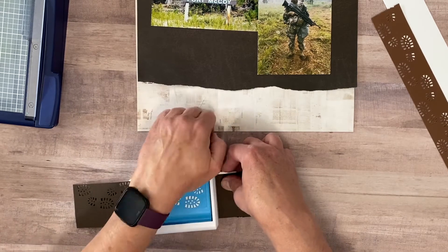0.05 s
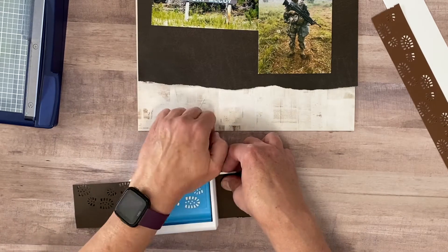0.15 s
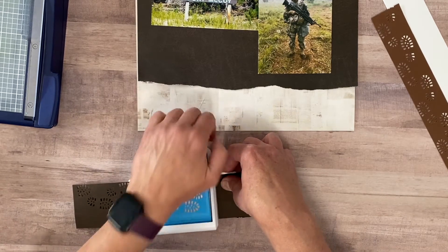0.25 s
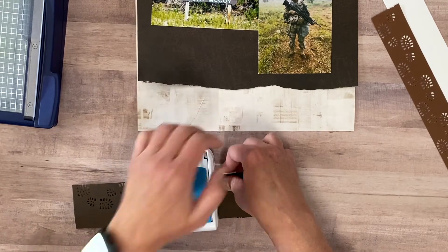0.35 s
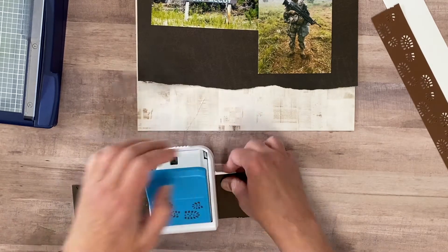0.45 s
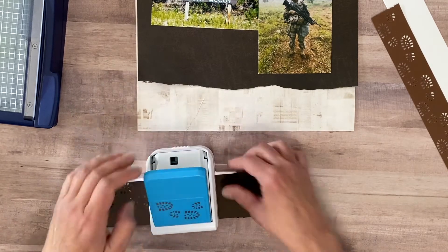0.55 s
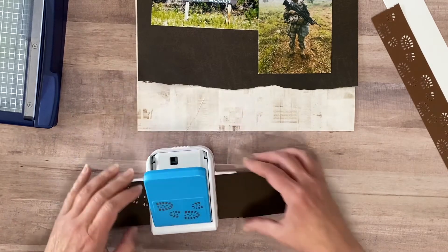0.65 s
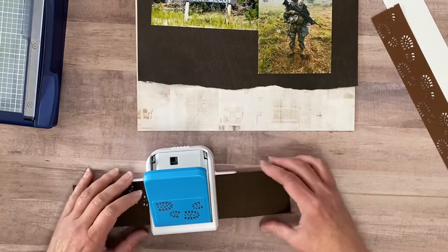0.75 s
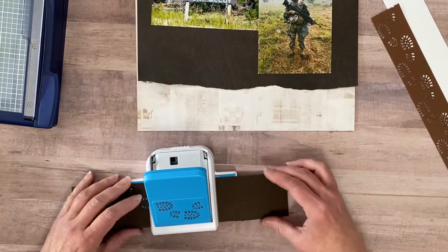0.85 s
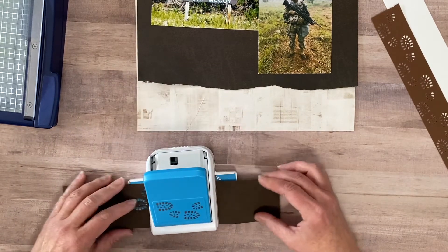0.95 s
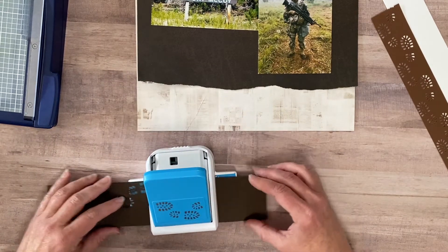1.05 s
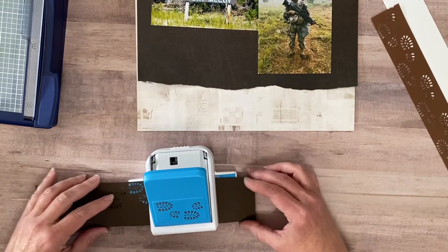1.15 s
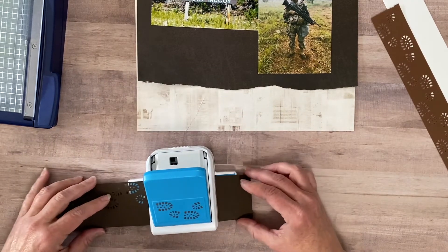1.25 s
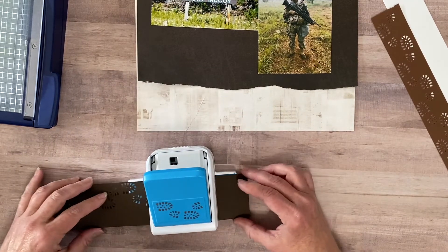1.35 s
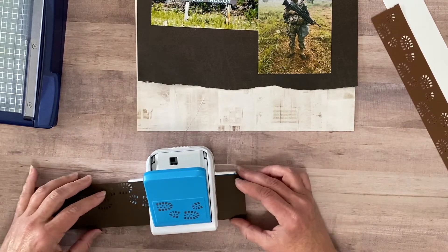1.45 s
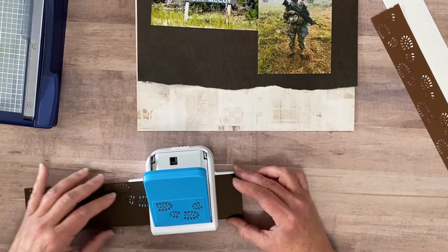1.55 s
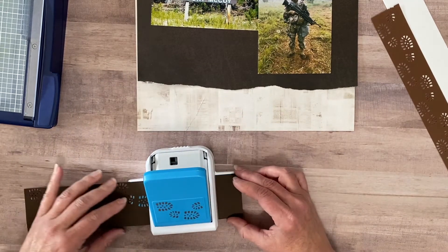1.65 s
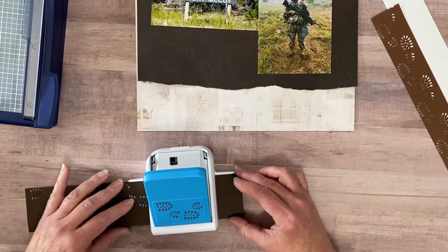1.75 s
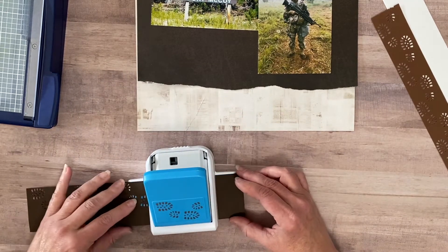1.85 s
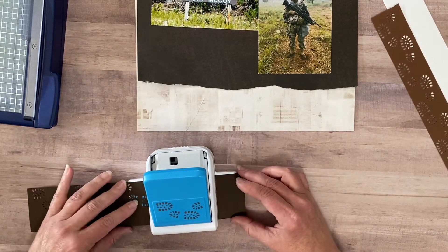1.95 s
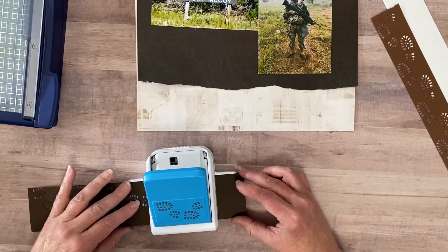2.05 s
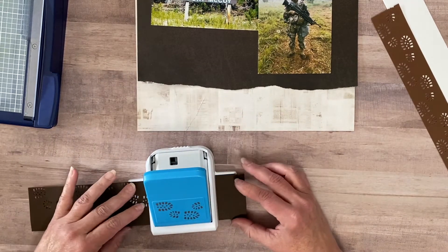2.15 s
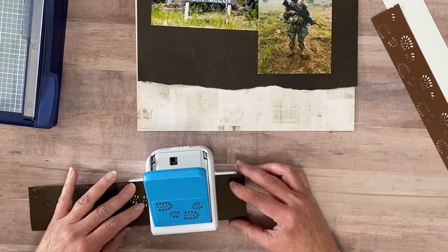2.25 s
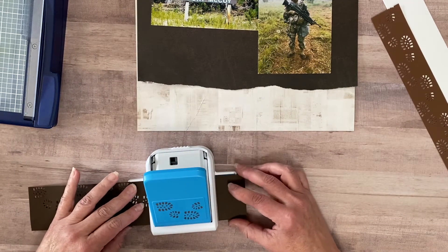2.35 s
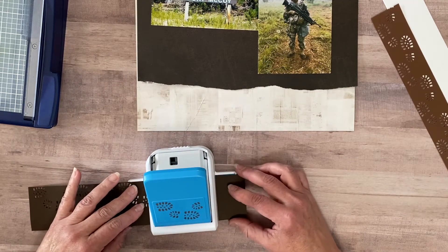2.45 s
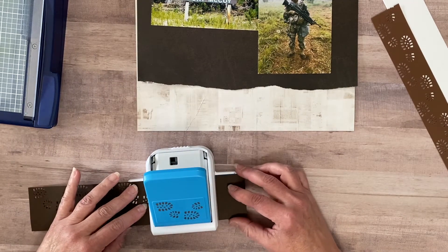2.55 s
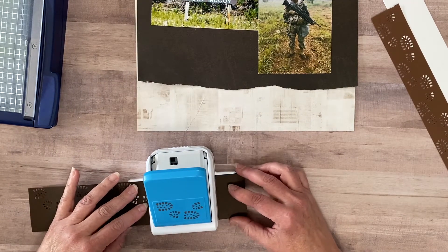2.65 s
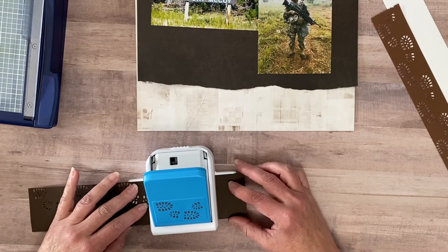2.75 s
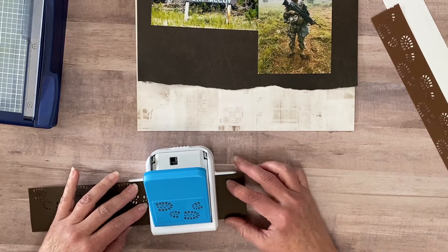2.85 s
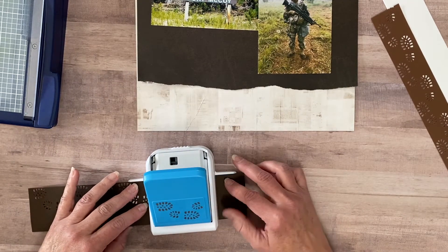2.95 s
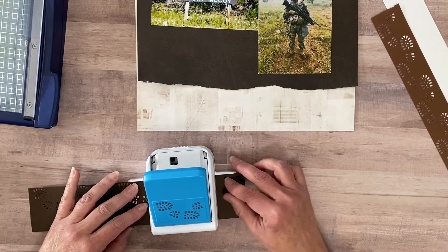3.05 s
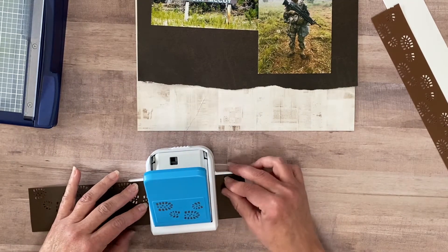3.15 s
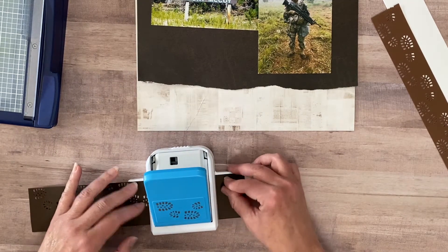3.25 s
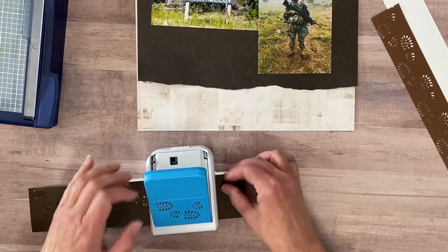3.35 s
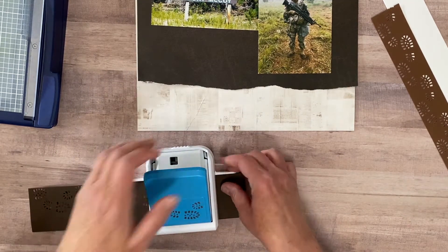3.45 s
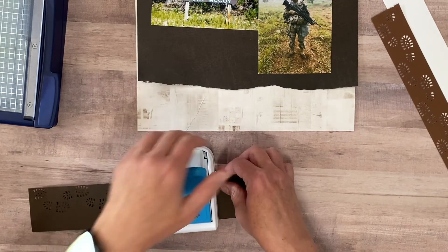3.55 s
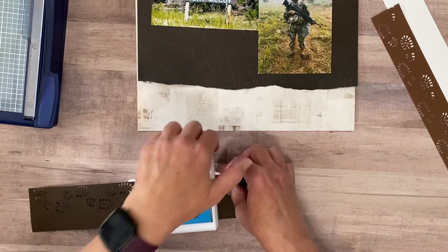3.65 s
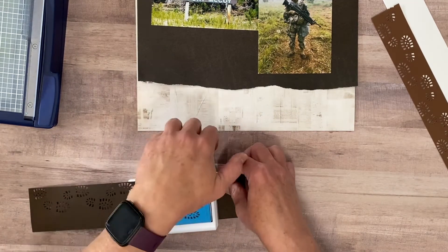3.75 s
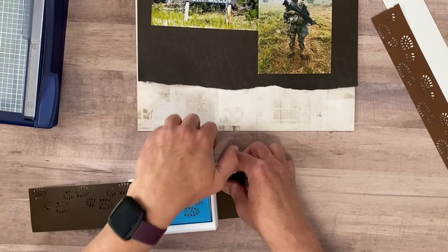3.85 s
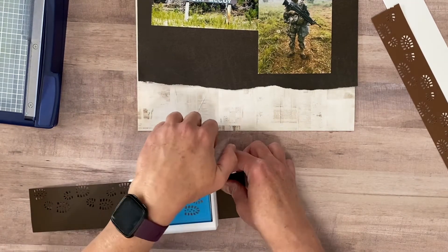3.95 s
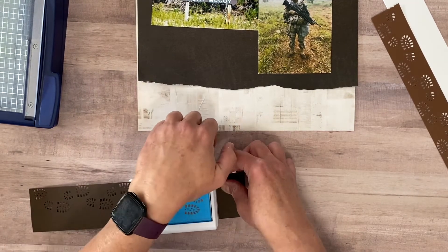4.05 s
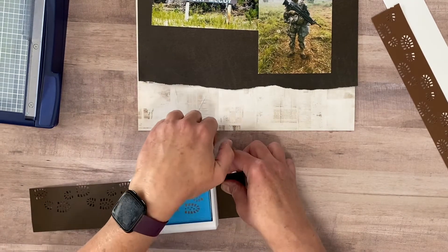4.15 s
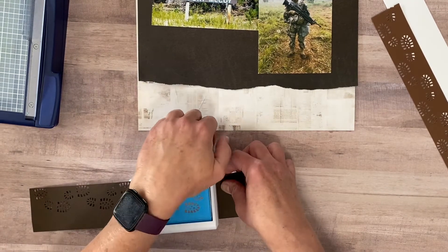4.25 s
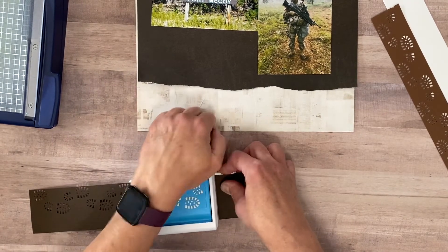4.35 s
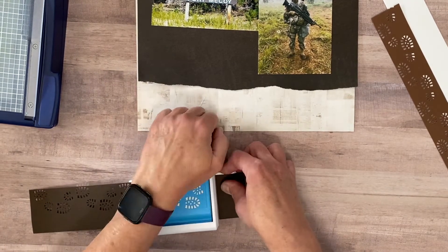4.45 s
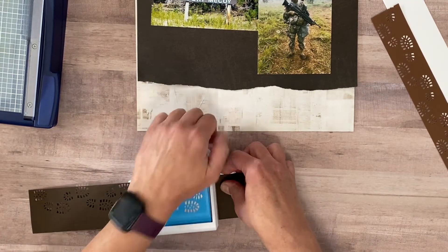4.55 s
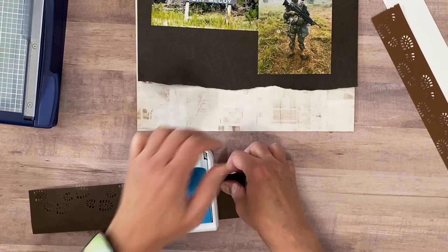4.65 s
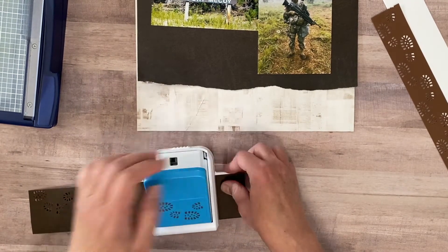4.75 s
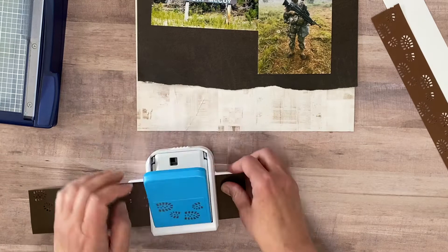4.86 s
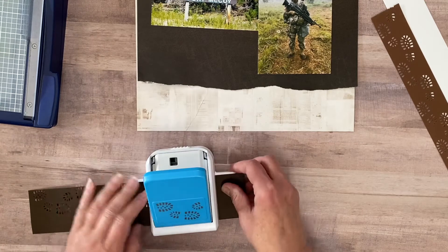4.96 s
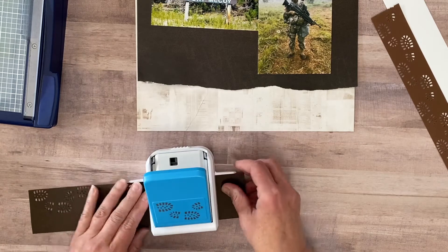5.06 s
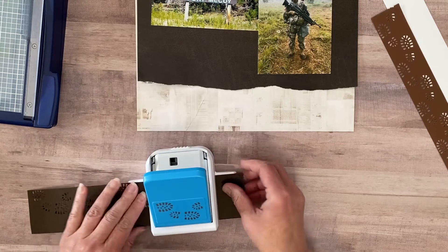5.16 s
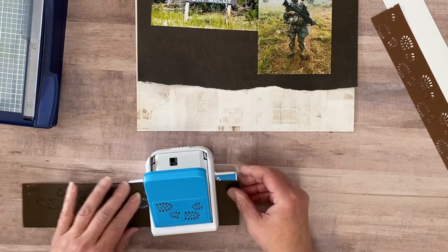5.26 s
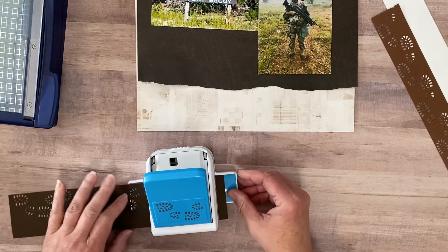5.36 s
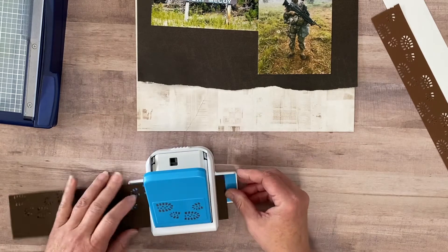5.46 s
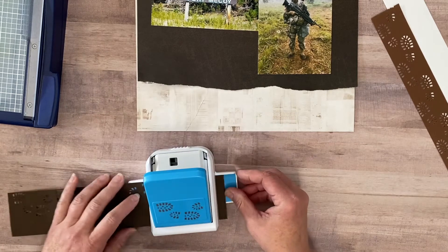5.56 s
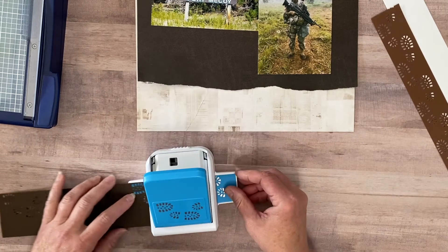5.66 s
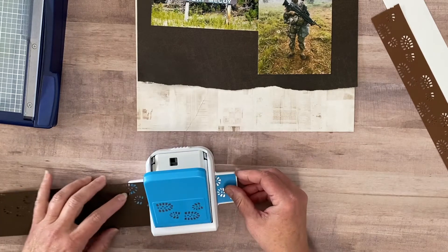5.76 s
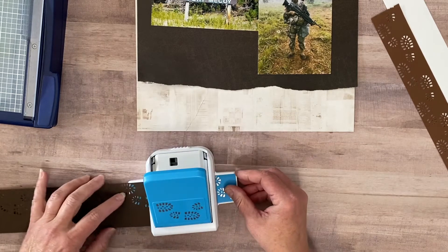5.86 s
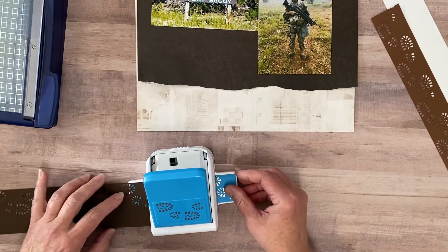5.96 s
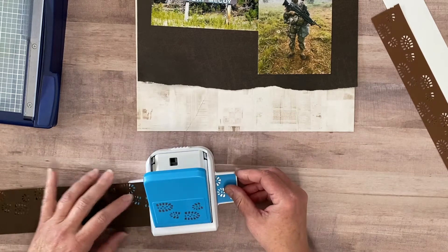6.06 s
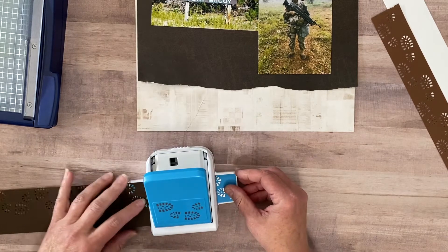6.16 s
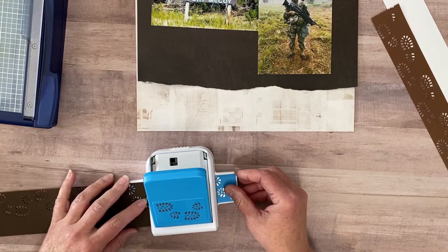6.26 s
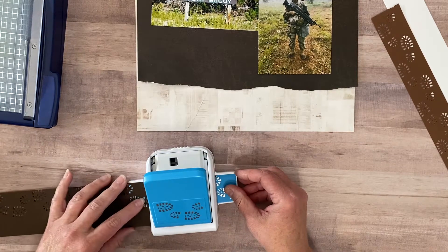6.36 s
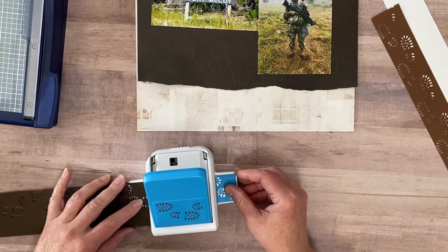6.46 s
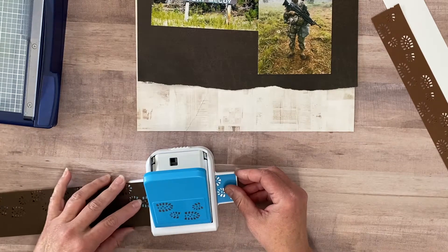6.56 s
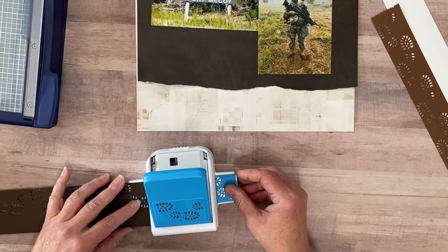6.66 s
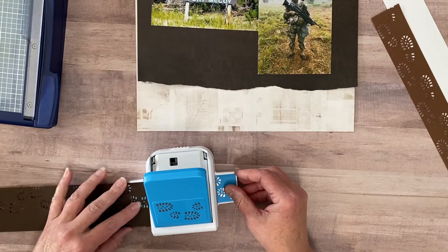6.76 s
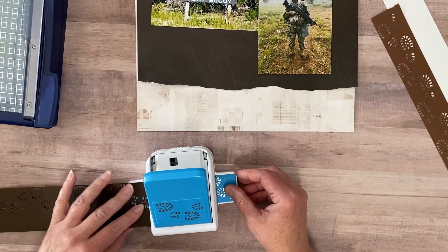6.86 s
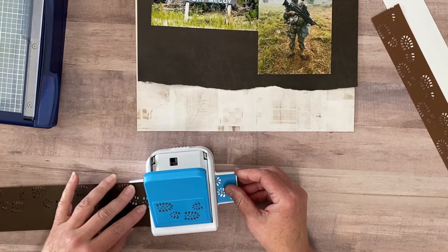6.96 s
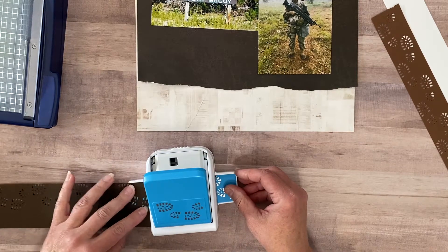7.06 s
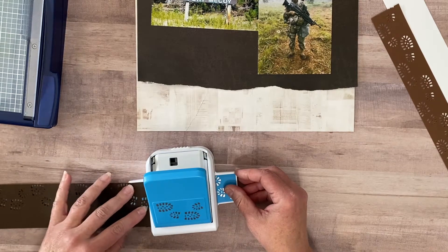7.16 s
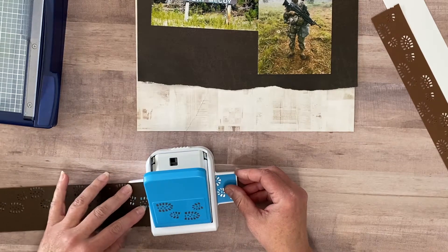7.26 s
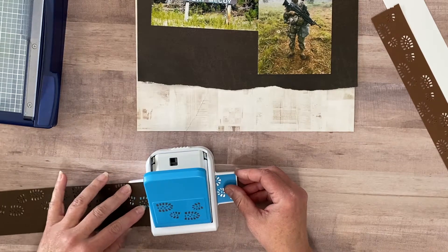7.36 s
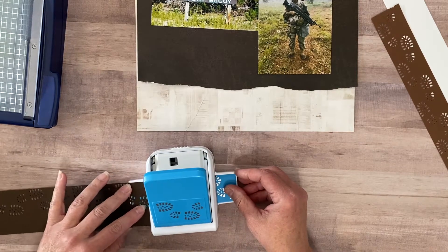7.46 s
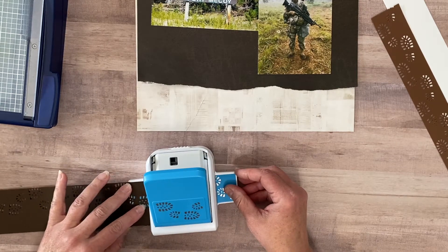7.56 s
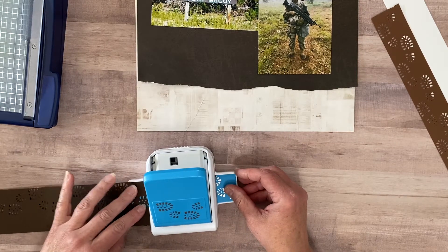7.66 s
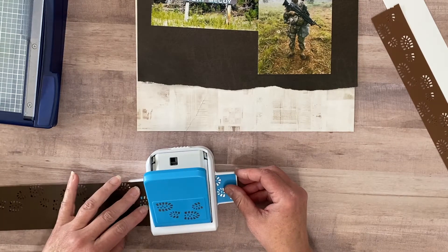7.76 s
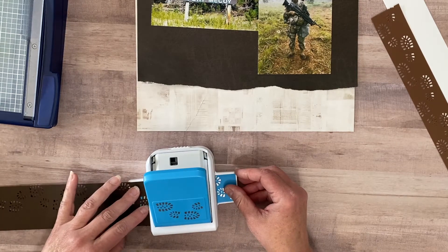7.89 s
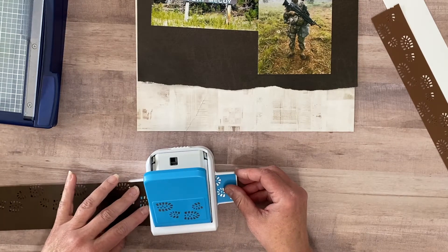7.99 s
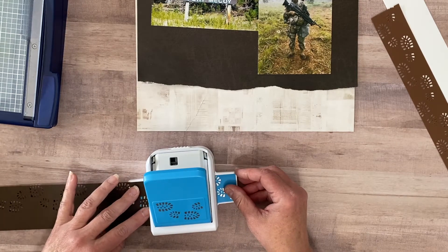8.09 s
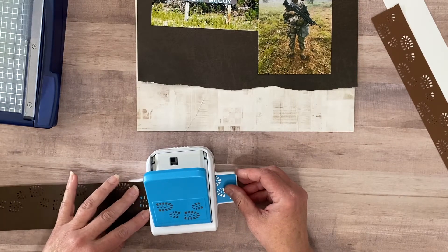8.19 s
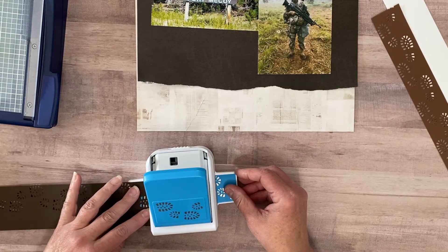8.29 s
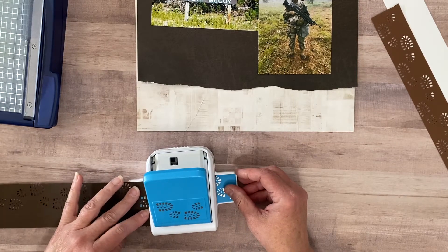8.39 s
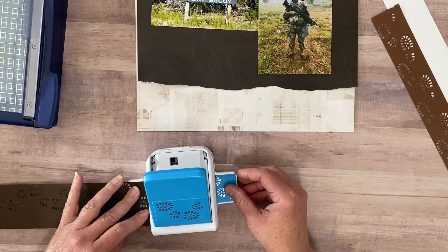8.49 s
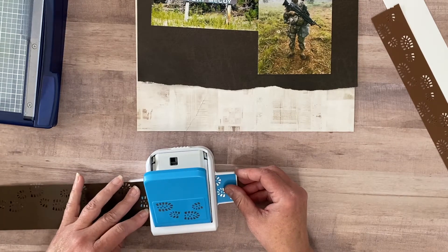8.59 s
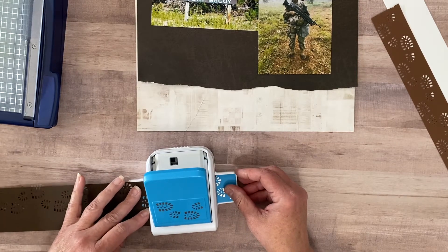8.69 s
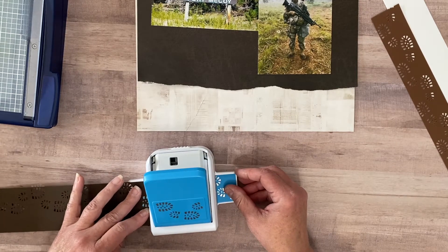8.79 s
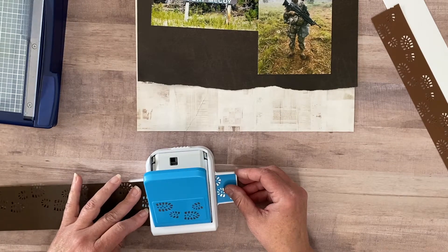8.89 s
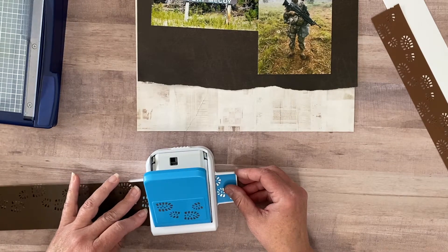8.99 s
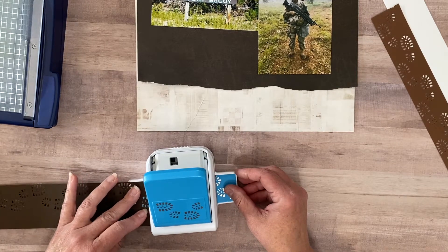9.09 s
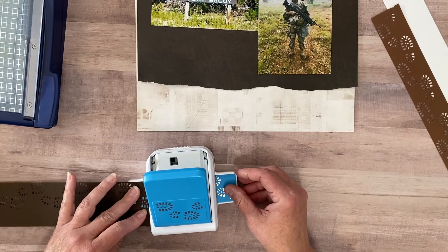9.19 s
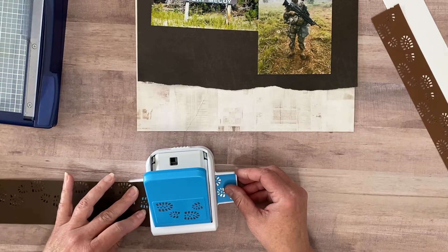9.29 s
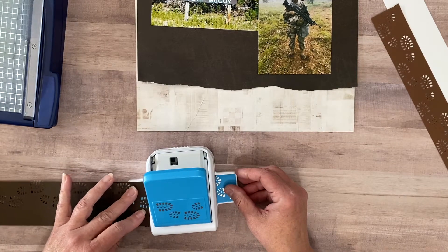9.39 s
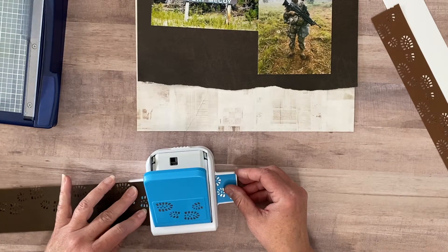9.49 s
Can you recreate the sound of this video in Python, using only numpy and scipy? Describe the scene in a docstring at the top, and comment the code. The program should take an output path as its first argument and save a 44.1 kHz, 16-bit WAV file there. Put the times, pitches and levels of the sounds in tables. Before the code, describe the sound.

Loud plastic clunks and a crunch from a lever punch cutting card, followed by quiet paper sliding and fingertip nudges on a desk.

```python
"""A paper punch on a wooden desk

In a small room, the lever of a plastic border punch slides up and clacks against its stop. A card strip
hisses and flicks as it is fed along. The punch is gripped and its teeth crunch through the card, loudly
enough to overload the recorder. The lever returns, and fingertips slide and nudge the strip into place.
Knocks set the punch and desk ringing, over a faint rumble of ventilation and an electrical hum."""
import sys
import numpy as np
from scipy import signal
from scipy.fft import rfft, irfft
from scipy.io import wavfile

SR = 44100
rng = np.random.default_rng(int(sys.argv[2]) if len(sys.argv) > 2 else 0)


def inscribe(sig):
    """Save sig as 16-bit PCM at rate SR to the path in sys.argv[1].

    A 1-D sig is mono; a 2-D sig holds one channel per row.
    Samples are clipped to [-1, 1] before scaling.
    """
    pcm = np.round(np.clip(np.atleast_2d(sig).T, -1, 1) * 32767)
    wavfile.write(sys.argv[1], SR, pcm.astype(np.int16))


N = 420273
TIME = np.arange(N) / SR

# Knocks on the punch, and the low thud that echoes just after each lever stop. Each row: start in
# seconds, desk sway in dB, thud pitch in Hz, thud in dB, clack pitch in Hz, clack in dB, crack in dB.
KNOCKS_AND_THUDS = [(0.050, -28.5, 300, -27.5, 1900, -32, -40.5),
                    (0.083, -20, 200, -17.5, 584, -22.5, -37.5), (.191, -24, 190, -10, 350, -28.5, -62),
                    (3.481, -30, 60, -37, 1700, -49, -66), (3.711, -42.5, 650, -21, 1045, -24.5, -39.5),
                    (3.719, -15, 110, -23, 1103, -29.5, -36.5), (3.772, -20, 94.66, -30, 701.7, -28, -35),
                    (3.833, -37, 270, -14, 799.6, -31, -31.5), (3.8433, -25, 370, -8.5, 815.4, -11, -26.5),
                    (3.849, -33.5, 140, -19, 1607, -8, -34), (3.950, -23.5, 290, -8.5, 1301, -20, -21.5),
                    (3.972, -24.5, 65, -15.5, 420.4, -26, -33), (4.045, -30.5, 90, -41.5, 900, -33, -33.5),
                    (4.109, -28.5, 110, -25, 994, -28.5, -29),
                    (4.126, -32.5, 300, -13.5, 843, -17.5, -26.5),
                    (4.1376, -13.5, 189.9, 0.5, 750, -9, -25), (4.142, -14.5, 400, 7.5, 1148, 6, -5),
                    (4.153, -15.5, 82, 3.5, 1000, 6, -2), (4.163, -16.5, 240, 7.5, 1713, 2, -4),
                    (4.1691, -3.5, 45.05, -0.5, 502.6, 9, 5.5), (4.181, -15, 80, 2.5, 998, -1.5, -6.5),
                    (4.189, -8, 197, 6.5, 2050, -7, -9.5), (4.202, -10.5, 197, 5, 410, -2, -18),
                    (4.227, -17, 82, 0, 480, -9.5, -16), (4.398, -14.5, 200, -16, 765, -19, -35),
                    (4.5, -21.5, 150, -12, 348.2, -39, -39.5)]
# The lever hits its stop. Each row: start in seconds, ring pitch in Hz, then ring, thud and crack in dB.
LEVER_STOPS = [(0.1577, 969, -2.5, -4, -16), (4.4670, 963, -6.5, -7, -12.5)]
# Rubbing strokes: the lever rubs in its guides, and the row from 3.943 s is the card and hands creaking as the
# punch is pressed. Each row: start and end in seconds, hiss at the start and at the end # in dB, judder in dB
# above the hiss.
RUB_STROKES = [(0.08, 0.162, -40, -28.5, 6.5), (3.699, 3.944, -53, -57, 11),
               (3.943, 4.125, -45.5, -49, 4.5), (4.391, 4.47, -39, -29, 9)]
# Notes of the punch and desk. Each row: pitch in Hz, level in dB, seconds to fade by 60 dB.
BODY_NOTES = [(83.6, -6, 0.39), (159, -6, 0.06), (194.8, -5, 0.031), (280, -5, 0.22), (355.4, -3.5, 0.49),
              (415, -2, .25), (486, -2, 0.23), (552, -4.5, .25), (746, -3, 0.39), (791, 1, 0.37),
              (1014, -3.5, .2), (1320, -2.5, .25), (1485, -5, .25), (1655, 3.5, .24), (1860, 1, .16),
              (2120, 0.5, 0.13), (2195, 3.5, .2), (2530, -7, .16), (5300, -0.5, 0.17)]
# Dry plastic ticks. Each row: start in seconds, level in dB, pitch in Hz.
PLASTIC_TICKS = [(0.413, -33.5, 12100), (0.571, -28.5, 7150), (0.701, -34, 6240), (2.882, -29.5, 7060),
                 (3.430, -38.5, 4300), (3.77, -7.5, 6540), (3.7707, -20.5, 1950), (4.669, -49, 3500),
                 (7.228, -43, 10980)]
# Hands grip and let go. Each row: start in seconds, bump level in dB, desk sway in dB.
HAND_BUMPS = [(0.528, -32, -56), (.596, -33, -43), (3.429, -33, -42), (3.529, -41, -29.5),
              (3.771, -14.5, -29.5), (4.6488, -21, -32), (4.792, -26, -36.5)]
# The card's edge catches. Each row: start in seconds, snap in dB, fade time in seconds, flap in dB,
# tap in dB.
CARD_FLICKS = [(0.697, -36, 0.0031, -43.5, -55), (.903, -54, 0.0081, -40, -46),
               (1.111, -59, 0.017, -49.5, -43), (1.3, -66, 0.012, -46.5, -39),
               (2.704, -51, 0.0048, -47, -53), (3.105, -55, 0.017, -58, -47),
               (3.1662, -35, .0024, -49, -54), (3.1702, -25, 0.0044, -29.5, -49),
               (3.477, -59.5, 0.0077, -52, -45), (3.525, -55, .0072, -57, -41),
               (4.816, -18, .0027, -60, -26), (5.081, -49, 0.0033, -40, -49),
               (5.135, -43, 0.0075, -41, -55), (5.3164, -41.5, 0.0075, -34.5, -28.5),
               (5.336, -47, 0.004, -55, -42), (5.7965, -56, 0.0056, -50, -39.5),
               (6.037, -51.5, 0.0075, -45.5, -39.5), (6.058, -58, 0.0055, -44, -51),
               (7.084, -60, 0.018, -66, -50), (7.886, -54, .005, -65, -63),
               (9.345, -56.5, 0.0058, -50.5, -60)]
# Notes of the punch when the card taps it. Each row: pitch in Hz, level in dB.
TAP_NOTES = [(1100, 0.5), (1230, -11), (1500, -22), (3560, -13)]
# Pushes of the strip. Each row: fastest moment, rise and fall in seconds, then hiss and ring in dB.
CARD_PUSHES = [(.35, 0.059, 0.034, -56.5, -59), (.52, 0.12, 0.35, -57, -58.5),
               (.81, 0.12, 0.097, -43.5, -58.5), (.92, 0.15, 0.14, -54, -52.5),
               (1.22, 0.36, 0.14, -61, -60), (1.39, 0.21, .2, -56, -69), (1.7, 0.18, 0.49, -68.5, -68),
               (1.97, 0.056, 0.044, -55.5, -55.5), (2.23, 0.18, 0.2, -69, -68.5),
               (2.62, 0.06, 0.19, -65, -66.5), (2.742, 0.02, .024, -43.5, -46),
               (2.91, 0.0099, 0.043, -53, -72), (3.0, 0.085, 0.071, -53, -53.5),
               (3.218, 0.071, 0.023, -61, -50.5), (3.35, .04, .03, -61, -61.5),
               (3.54, 0.083, 0.044, -57.5, -57), (3.7, 0.061, .03, -61.5, -55),
               (4.67, 0.053, 0.2, -55.5, -59.5), (4.863, 0.0087, 0.015, -36.5, -42.5),
               (4.935, .02, .05, -46.5, -58), (5.14, 0.14, .05, -49.5, -55),
               (5.2, 0.019, 0.012, -39.5, -43.5), (5.33, 0.049, .025, -50.5, -55),
               (5.47, 0.088, 0.18, -52, -58.5), (5.797, 0.011, 0.0084, -46.5, -51),
               (5.91, 0.048, 0.026, -54, -72), (5.995, 0.018, 0.13, -58, -69),
               (6.21, 0.047, .04, -62.5, -58.5)]
# Fingertips move the strip. Each row: start in seconds, length in seconds, level in dB.
FINGER_NUDGES = [(6.43, 0.11, -66), (6.53, 0.067, -59.5), (6.61, 0.18, -64), (6.79, 0.076, -63),
                 (6.91, 0.16, -69), (7.05, 0.09, -59.5), (7.26, 0.076, -70.5), (7.38, 0.057, -65.5),
                 (7.5, .09, -63.5), (7.69, 0.075, -72), (7.88, 0.17, -64.5), (8.1, 0.16, -65),
                 (8.3, 0.11, -71), (8.43, .16, -68.5), (8.65, 0.074, -67), (8.75, 0.065, -73),
                 (8.89, 0.13, -69), (9.07, 0.14, -66), (9.2, 0.16, -64)]
FINGER_WHISTLES = [(8.88, 0.147, -73), (9.14, 0.2, -65)]
# Hum of the mains power. Each row: pitch in Hz, level in dB.
HUM_NOTES = [(60, -62), (139, -69), (239.6, -58)]

# Tone shapes: how strong the lows and highs of a noise are. Each row: frequency in Hz, level in dB.
CRUNCH_TONE = [(40, -16.5), (100, -6), (200, 6.5), (450, 5.5), (650, -3.5), (1050, -0.5), (1400, -8.5),
               (2100, -7.5), (3000, -21), (6000, -21.5), (9500, -25), (11000, -36.5), (16000, -47)]  # teeth cutting card
CRACK_TONE = [(300, -6), (800, -2), (1500, 3), (2600, -5), (3700, -4), (5200, -4.5), (9000, -7),
              (11000, -17), (16000, -25)]  # the sharp start of a knock
LEVER_HISS_TONE = [(900, 3.5), (2000, 2.5), (3000, -5), (5000, -4.5), (9000, -0.5), (11000, -19.5),
                   (16000, -18)]  # plastic on plastic
JUDDER_TONE = [(30, -5.5), (100, -7), (230, 3), (400, -0.5), (650, -10.5), (1000, -7), (1400, -19.5),
               (2500, -34.5), (5000, -51.5)]  # the lever's spring
SLIDE_HISS_TONE = [(1200, -8.5), (2200, -18), (3100, -9.5), (3600, -4.5), (5000, -3.5), (6200, -2.5),
                   (7200, 3.5), (8200, 2), (9200, -3), (10500, -10.5), (13000, -14), (16000, -18.5)]  # card rubbing in the slot
SLIDE_RING_TONE = [(200, -14.5), (450, -5), (700, -3.5), (970, 4.5), (1100, 5.5), (1230, -4), (1700, -3.5),
                   (2200, -6.5), (2800, -11), (5000, -31.5)]  # the punch ringing as card slides
SNAP_TONE = [(300, -4.5), (800, -12), (1500, -2.5), (2600, -6.5), (3700, 1), (5000, -4), (6800, 7.5),
             (9000, -6.5), (11000, -20), (16000, -26)]  # the card's edge slipping free
FLAP_TONE = [(200, 2.5), (450, 4), (800, 3), (1200, 3), (1900, -2.5), (2600, -7.5), (5000, -26)]  # the card flapping
NUDGE_HISS_TONE = [(1200, -14), (2200, -14), (3000, -9), (3600, 0.5), (4400, -5.5), (6300, -4), (7200, 4),
                   (8000, -1.5), (9200, -4), (10500, -15), (16000, -11.5)]  # card rubbing under fingertips
NUDGE_RING_TONE = [(200, -16), (450, -15), (700, -8), (970, 4), (1100, 8.5), (1300, -2), (1700, -0.5),
                   (2200, -3), (2800, -10), (5000, -27)]  # the punch ringing as card is nudged
ROOM_TONE = [(25, -1), (100, 3.5), (250, 6), (700, 1.5), (2000, 1), (4000, -2.5), (9000, -3.5),
             (11000, -6.5), (16000, -8)]  # echoes from the walls
VENT_TONE = [(20, 6), (43, -6), (65, -8), (86, -9.5), (130, -13), (175, -13), (330, -13.5), (450, -18.5),
             (700, -24), (1100, -25.5), (1600, -33), (2700, -40), (5000, -40), (8000, -42.5), (16000, -50)]  # ventilation


def crunch(start=4.142, hold=0.034, rise_db_per_s=2100.5, fall_db_per_s=430):
    """Small teeth burst through the card: the force builds fast, holds while they cut, then falls."""
    before = np.maximum(start - TIME, 0)
    after = np.maximum(TIME - start - hold, 0)
    force_db = np.maximum(-rise_db_per_s * before - fall_db_per_s * after, -200)
    return gain(force_db) * shape_tone(grains(2500, 2.5), CRUNCH_TONE)


def knocks_and_thuds():
    """Knocks crack, thud and sway the desk; a low thud also echoes just after each lever stop."""
    out, t = np.zeros(N), TIME[:SR // 2]
    for start, sway_db, thud_hz, thud_db, _, _, crack_db in KNOCKS_AND_THUDS:
        crack = shape_tone(rng.standard_normal(len(t)) * fade(t, 0.024), CRACK_TONE)
        low = gain(sway_db) * ring(t, 30, cycles=7.1) + gain(thud_db) * ring(t, thud_hz, cycles=6)
        add(out, start, low + gain(crack_db) * crack)
    return out


def housing_clacks(swell_s=0.0014, delay_s=0.00046):
    """The hollow housing rings with two short notes at each knock, thud and lever stop."""
    out, t = np.zeros(N), TIME[:SR // 10]
    for start, _, _, _, hz, db, _ in KNOCKS_AND_THUDS:
        clack = ring(t, hz, cycles=18) - gain(-16) * ring(t, 1.6 * hz, cycles=10)
        add(out, start, gain(db) * clack)
    swell = (t / swell_s) ** 2 * np.exp(-t / swell_s)
    for start, hz, db, _, _ in LEVER_STOPS:
        main = 2 * swell * np.sin(2 * np.pi * hz * t)
        overtone = gain(-18) * ring(t, 1.9 * hz, cycles=40)
        add(out, start + delay_s, gain(db) * (main + overtone))
    return out


def lever_stops(delay_s=0.00056, rise_s=0.00075):
    """The spring drives the lever into its stop with a crack and a thud."""
    out, t = np.zeros(N), TIME[:SR // 2]
    thud = -2 * ring(t, 140, cycles=4.9) * (1 - np.exp(-t / rise_s))
    for start, _, _, thud_db, crack_db in LEVER_STOPS:
        crack = shape_tone(rng.standard_normal(len(t)) * fade(t, 0.02), LEVER_HISS_TONE)
        add(out, start, gain(crack_db) * crack)
        add(out, start + delay_s, gain(thud_db) * thud)
    return out


def rub_strokes():
    """Rubbing strokes: a grainy hiss over a low judder, from the lever's plastic and from card and hands as the
    punch is pressed."""
    hiss = shape_tone(grains(9000, 2.1), LEVER_HISS_TONE)
    judder = shape_tone(grains(3000, 0.72), JUDDER_TONE)
    out = np.zeros(N)
    for start, end, start_db, end_db, judder_db in RUB_STROKES:
        span = slice(int(start * SR), int(end * SR))
        rub = hiss[span] + gain(judder_db) * judder[span]
        add(out, start, rub * gain(np.linspace(start_db, end_db, len(rub))))
    return out


def body_ring(sound):
    """The punch and desk ring on faintly at their own notes after being shaken."""
    t = TIME[:SR]
    notes = sum(gain(db) * np.sin(2 * np.pi * hz * t) * fade(t, fade_s) for hz, db, fade_s in BODY_NOTES)
    return through(sound, gain(-62) * notes)


def handling():
    """The plastic ticks, and hands make sudden dull bumps that rock the desk."""
    out, t = np.zeros(N), TIME[:SR // 2]
    for start, db, hz in PLASTIC_TICKS:
        add(out, start, gain(db) * ring(t, hz, cycles=12.6))
    sudden_rise = 1 - np.exp(-t / 0.00005)
    bump = np.cos(2 * np.pi * 125 * t - 0.5) * fade(t, 0.023) * sudden_rise
    for start, db, sway_db in HAND_BUMPS:
        add(out, start, gain(db) * bump + gain(sway_db) * ring(t, 26, cycles=12))
    return out


def card_flicks():
    """The strip's edge slips free in a burst of tiny snaps; the card flaps and taps the punch."""
    snaps, flaps, taps = np.zeros((3, N))
    t = TIME[:SR // 10]
    for start, snap_db, fade_s, flap_db, tap_db in CARD_FLICKS:
        snap, flap = rng.standard_normal((2, len(t))) * np.exp(-t / fade_s)
        detunes = 1 + 0.015 * rng.standard_normal(len(TAP_NOTES))
        tap = sum(gain(db) * ring(t, hz * detune, cycles=42)
                  for (hz, db), detune in zip(TAP_NOTES, detunes))
        add(snaps, start, gain(snap_db) * snap)
        add(flaps, start, gain(flap_db) * flap)
        add(taps, start, gain(tap_db) * tap * (1 - np.exp(-t / 0.00023)))
    return shape_tone(snaps, SNAP_TONE) + shape_tone(flaps, FLAP_TONE) + taps


def card_slides(roundness=1.426):
    """The strip is fed through the slot in pushes that speed up and slow down."""
    hiss_power, ring_power = np.zeros((2, N))
    for peak, rise, fall, hiss_db, ring_db in CARD_PUSHES:
        start = max(peak - 3 * rise, 0)
        from_peak = TIME[:int((peak - start + 3 * fall) * SR)] + start - peak
        distance = np.maximum(-from_peak / rise, from_peak / fall)
        speed = np.exp(-distance ** roundness)  # roundness 1 gives a point, 2 a bell shape
        add(hiss_power, start, (gain(hiss_db) * speed) ** 2)
        add(ring_power, start, (gain(ring_db) * speed) ** 2)
    return card_friction(np.sqrt(hiss_power), np.sqrt(ring_power), SLIDE_HISS_TONE, SLIDE_RING_TONE,
                         slip_db=1.83, spread_db=-0.5, clicks_per_s=5200)


def finger_nudges():
    """Fingertips ease the strip into line; the slow movement sounds grainier."""
    level = finger_level(FINGER_NUDGES)
    return card_friction(level, gain(-4) * level, NUDGE_HISS_TONE, NUDGE_RING_TONE,
                         slip_db=2.2, spread_db=1.8, clicks_per_s=4500)


def card_friction(hiss_level, ring_level, hiss_tone, ring_tone, slip_db, spread_db, clicks_per_s):
    """Card drags in uneven slips; the rubbing hisses and makes the hollow punch ring."""
    grip = gain(slip_db * wander(60))
    hiss = shape_tone(grains(clicks_per_s, spread_db) * grip * hiss_level, hiss_tone)
    return hiss + shape_tone(grains(2600, 2.4) * grip * ring_level, ring_tone)


def finger_whistle(hz=7300, width_hz=420):
    """Skin dragging on card brings out one thin, high note."""
    narrow_filter = signal.iirpeak(hz, hz / width_hz, fs=SR)
    note = signal.lfilter(*narrow_filter, grains(3400, 2.27))
    return note / note.std() * finger_level(FINGER_WHISTLES) * gain(2.5 * wander(50))


def finger_level(moves, rise_s=0.016, fall_s=0.022):
    """Each short fingertip movement grows louder, holds and drops away."""
    out = np.zeros(N)
    for start, length, db in moves:
        t = TIME[:int(length * SR)]
        ramps = np.minimum(t / rise_s, (length - t) / fall_s)
        add(out, start, gain(db) * np.minimum(ramps, 1))
    return out


def room_echo(sound, fade_s=0.34, bass_fade_s=0.28, build_s=0.0066):
    """Echoes from nearby walls build up quickly and die away, the bass a little sooner."""
    t, noise = TIME[:SR], rng.standard_normal(SR)
    bass = signal.sosfilt(signal.butter(1, 200, fs=SR, output="sos"), noise)
    echoes = bass * fade(t, bass_fade_s) + (noise - bass) * fade(t, fade_s)
    build_up = 1 - np.exp(-(t / build_s) ** 2)
    tail = shape_tone(echoes * build_up, ROOM_TONE)
    return through(sound, tail / np.linalg.norm(tail))


def opening_ring():
    """At the start, the room's ring from a cut dies away: fading noise with the tone of the crunch."""
    return gain(-35) * fade(TIME, 0.98) * shape_tone(rng.standard_normal(N), CRUNCH_TONE)


def background():
    """Ventilation rumbles, and the mains power hums with a slight waver."""
    hum = np.zeros(N)
    for hz, db in HUM_NOTES:
        level = gain(db + 1.8 * wander(4))
        hum += level * np.sqrt(2) * np.sin(2 * np.pi * hz * TIME + 0.15 * wander(3))
    return hum + gain(-49.5) * shape_tone(rng.standard_normal(N), VENT_TONE, size=8192)


def gain(db):
    """Turn decibels into a number to multiply by."""
    return 10 ** (np.asarray(db) / 20)


def add(out, start, sound):
    """Mix a sound in at a start time in seconds."""
    i = int(start * SR)
    out[i:i + len(sound)] += sound[:N - i]


def through(sound, response):
    """Pass a sound through something, given its response to a single click."""
    return signal.oaconvolve(sound, response)[:len(sound)]


def shape_tone(sound, tone, size=2048):
    """Filter a sound with a tone shape; white noise keeps its level."""
    hz, db = np.transpose(tone)
    frequencies = np.fft.rfftfreq(size, 1 / SR) + 1
    gains = gain(np.interp(np.log(frequencies), np.log(hz), db))
    # these steps make the filter ring only after a click, never before it
    cepstrum = irfft(np.log(gains))[:size // 2]
    cepstrum[1:] *= 2
    response = irfft(np.exp(rfft(cepstrum, size)))
    return through(sound, response / np.linalg.norm(response))


def fade(t, seconds):
    """Die away by 60 dB in the given time."""
    return np.exp(-np.log(1000) * t / seconds)


def ring(t, hz, cycles):
    """A note that dies away in so many vibrations."""
    return np.sin(2 * np.pi * hz * t) * fade(t, cycles / hz)


def grains(clicks_per_s, spread_db):
    """Tiny clicks of random size, like fibres letting go."""
    sizes = gain(spread_db * np.minimum(rng.exponential(size=N), 6))
    clicks = (rng.random(N) < clicks_per_s / SR) * sizes * rng.standard_normal(N)
    return clicks / clicks.std()


def wander(steps_per_s):
    """A value that drifts at random, mostly between -1 and 1."""
    steps = rng.standard_normal(N // 20)
    return np.interp(TIME * steps_per_s, np.arange(len(steps)), steps)


def scene():
    """Mix the punch, the card and the room into one channel."""
    punch = knocks_and_thuds() + rub_strokes() + crunch()
    card = card_flicks() + card_slides() + finger_nudges() + finger_whistle()
    near = punch + body_ring(punch) + card
    housing = housing_clacks() + lever_stops()
    # the small housing is loud close by but sends little into the room
    room = gain(-12.5) * room_echo(near + gain(-9.5) * housing)
    return (near + housing + room + handling() + opening_ring() + background())[None]


def record(dry, limit=0.97, top_hz=15950):
    """The overloaded recorder flattens the loudest peaks, then cuts the highest treble."""
    clipped = np.clip(dry, -limit, limit)
    return signal.sosfilt(signal.ellip(10, 0.1, 60, top_hz, fs=SR, output="sos"), clipped)


dry = scene()
out = record(dry)
inscribe(out)
```